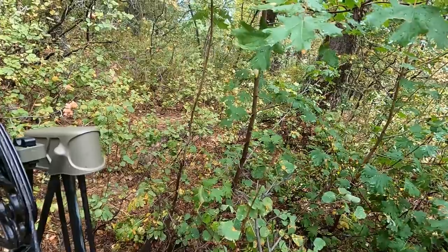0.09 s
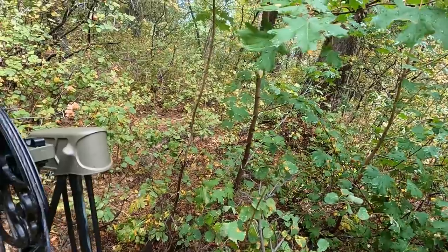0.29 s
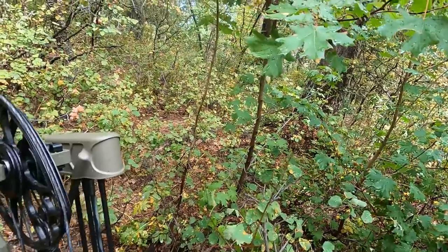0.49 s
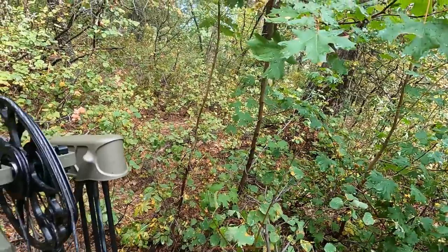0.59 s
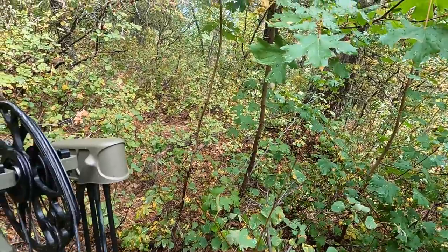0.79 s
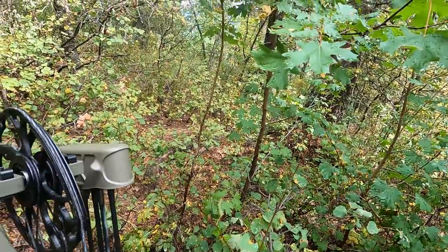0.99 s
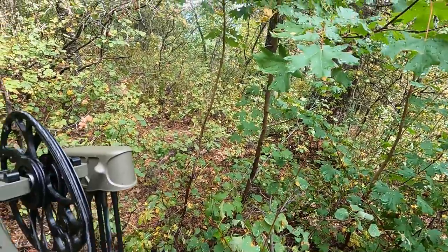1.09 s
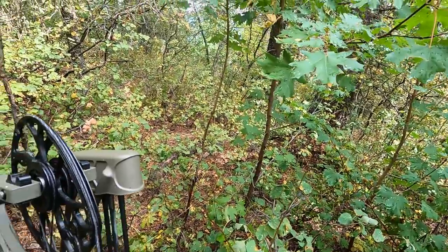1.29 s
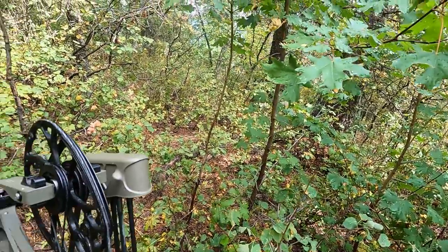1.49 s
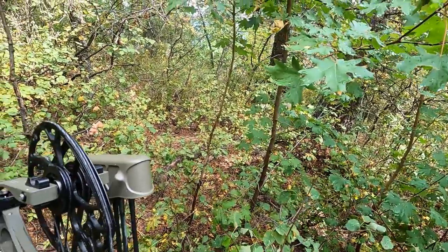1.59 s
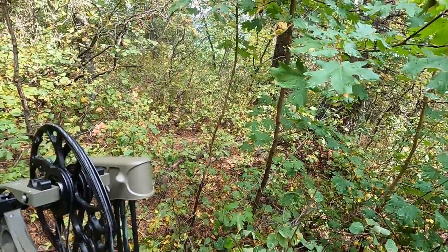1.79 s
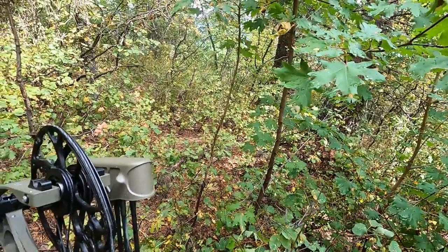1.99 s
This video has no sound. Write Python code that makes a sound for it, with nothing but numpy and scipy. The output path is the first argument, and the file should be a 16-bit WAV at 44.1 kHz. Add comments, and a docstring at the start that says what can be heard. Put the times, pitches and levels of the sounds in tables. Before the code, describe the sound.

Handling thump on a camera in quiet woods. A pale hollow tone around 1.2 kHz fades by 0.3 s while cloth friction grows from 0.1 s with a thin high whistle. A hard knock at 0.25 s, then a deep thump at 0.34 s stops the scrape. A faint whine lingers to 0.63 s, a small tick at 0.59 s; weak low hum, stirring near 1.8 s, and soft leafy hiss continue to 2 s.

```python
"""Cloth over a hand-held camera in quiet woods

Cloth slides over the housing, growing louder, bumps it and stops with a deep thump; the grip's faint hum
goes on over the soft hiss of the woods. Hisses are noise shaped in short-time spectra; hum, creak, rustle,
sway, hollow tone and whistle are noise through resonances; bumps are smooth pushes on ringing modes;
ticks are bursts of banded noise and a faint whine is a sine."""
import sys
import numpy as np
from scipy import signal
from scipy.io import wavfile
from scipy.ndimage import uniform_filter1d

SR = 44100
rng = np.random.default_rng(int(sys.argv[2]) if len(sys.argv) > 2 else 0)


def unload_wav(signal):
    """Save mono or channel-first audio to the path in sys.argv[1] as 16-bit WAV at rate SR, clipped to [-1, 1]."""
    wavfile.write(
        sys.argv[1],
        SR,
        np.round(np.clip(np.atleast_2d(signal).T, -1, 1) * 32767).astype(np.int16),
    )


N = 88200  # two seconds


def amp(db):
    """Gain of a level in dB."""
    return 10 ** (np.asarray(db) / 20)


def evened(x):
    """Scale to an RMS of 1."""
    return x / np.sqrt(np.mean(x ** 2) + 1e-20)


def read(points, hz):
    """Columns of a spectrum table, read on a log-frequency axis."""
    f, *values = np.transpose(points)
    return np.array([np.interp(np.log(hz + 1), np.log(f + 1), v) for v in values])


def curve(points, t):
    """Columns of a time table, read at times t."""
    s, *values = np.transpose(points)
    return np.array([np.interp(t, s, v) for v in values])


def sides(pan_db):
    """Left and right gains for a left-right difference in dB."""
    return amp(np.array([pan_db / 2, -pan_db / 2]))


def ring(x, hz, width_hz):
    """A resonance of fixed or moving pitch: shift it to 0 Hz, smooth, shift back."""
    turn = np.exp(2j * np.pi * np.cumsum(hz * np.ones(N)) / SR)
    r = np.exp(-np.pi * width_hz / SR)
    smooth = signal.lfilter([1 - r], [1, -r], x / turn)
    return 2 * (turn * smooth).real


def pair(same):
    """Left and right white noise of a given likeness."""
    a, b = rng.standard_normal((2, N))
    same = np.clip(same, -1, 1)
    return np.array([a, same * a + np.sqrt(1 - same ** 2) * b])


def frames(size, same, patch_db):
    """Random short-time spectra for two channels, with drifting louder and softer patches."""
    a, b, c, d, patch = rng.standard_normal((4 * N // size + 5, size // 2 + 1, 5)).T
    patch = uniform_filter1d(patch, size=size // 64, axis=0)  # over frequency
    patch = evened(uniform_filter1d(patch, size=10, axis=1))  # over time
    same = np.clip(same, -1, 1)
    left = a + 1j * b
    right = same * left + np.sqrt(1 - same ** 2) * (c + 1j * d)
    return np.array([left, right]) * amp(patch_db * patch)


def sound(z, size):
    """Short-time spectra back to a waveform."""
    return signal.istft(z, nperseg=size, noverlap=3 * size // 4)[1][:, :N]


def shaken(modes, same, pan_db, lumps_db, level):
    """Lumpy noise on a level curve shakes modes; each is two resonances in a row, the second twice as wide."""
    lumps = uniform_filter1d(rng.standard_normal(N), size=900)
    lumps = evened(uniform_filter1d(lumps, size=900))
    drive = pair(same) * amp(lumps_db * lumps + curve(level, np.arange(N) / SR)[0])
    gain = np.sqrt(sum(amp(2 * db) * np.pi * w / SR for _, w, db in modes) / 2)
    rung = sum(amp(db) * ring(ring(drive, hz, w), hz, 2 * w) for hz, w, db in modes)
    return rung / gain * sides(pan_db)[:, None]


def woods():
    """Distant leaves and air: smooth stereo hiss with a slow swell."""
    # tilt of the hiss: f/Hz, relative density/dB
    hiss_tilt = [(25, -31), (100, -12), (300, -4), (550, -14), (800, -16.5), (1500, -18), (2100, -22),
                 (3300, -27), (4550, -24), (5050, -21.5), (5700, -23), (7400, -28.5), (8600, -35),
                 (11800, -41.5), (13000, -50), (15500, -77)]
    # likeness of the two sides: f/Hz, likeness (0-1)
    hiss_same = [(60, 0.75), (240, 0.66), (950, 0.29), (3770, 0.65), (15000, 0.53)]
    # stereo balance: f/Hz, left over right/dB
    hiss_pan = [(60, -6), (240, 1.5), (950, -7), (3770, 1.5), (15000, 2.5)]
    # arrival at the two sides: f/Hz, phase by which left leads/rad
    hiss_lead = [(100, 0), (800, -.5), (2700, -1.3), (4300, -.4), (5600, -.1)]
    level_db, swell_db, patch_db = -62, .5, 1.2

    hz = np.fft.rfftfreq(1024, 1 / SR)
    z = frames(size=1024, same=read(hiss_same, hz)[0][:, None], patch_db=patch_db)
    t = np.arange(z.shape[2]) * 256 / SR
    swell = evened(sum(np.sin(2 * np.pi * (f * t + rng.random())) / np.sqrt(f)
                       for f in np.geomspace(.3, 6, num=20)))
    z = z * amp(read(hiss_tilt, hz)[0][:, None] + swell_db * swell)
    z = z * sides(read(hiss_pan, hz)[0])[:, :, None]
    z[0] *= np.exp(1j * read(hiss_lead, hz)[0])[:, None]
    return amp(level_db) * evened(sound(z, size=1024))


def hollow():
    """A pale hollow tone, narrow resonances in noise, hangs in the air at first and fades."""
    # resonances: f/Hz, width/Hz, relative level/dB
    hollow_modes = [(1227, 35, 11), (7800, 120, -13.5)]
    # fade: t/s, level/dB
    hollow_fade = [(0, -52.5), (.09, -56), (.16, -60), (.3, -104)]
    t = np.arange(N) / SR
    tone = shaken(hollow_modes, same=0.66, pan_db=0, lumps_db=0.98, level=hollow_fade)
    return tone * (t < hollow_fade[-1][0])


def whine():
    """A faint thin whine after the thump: a steady sine with soft ends."""
    # one row: start t/s, end t/s, f/Hz, RMS level at its middle/dB
    start, end, hz, db = (.375, .63, 4802, -82)
    t = np.arange(N) / SR
    swell = np.sin(np.pi * np.clip((t - start) / (end - start), 0, 1)) ** .5
    return amp(db) * np.sqrt(2) * swell * np.sin(2 * np.pi * hz * t)


def grip_hum():
    """The grip works on the housing: a low hum of gliding pitch and an upper creak, cut below."""
    # low hum: t/s, level/dB
    hum_level = [(0, -46.5), (.12, -46.5), (.145, -42), (.22, -39), (0.249, -40), (.285, -47), (.345, -61),
                 (.39, -52), (.44, -48.5), (.47, -59), (.55, -57), (.66, -59.5), (.73, -50), (.97, -52),
                 (1.0, -60.5), (1.04, -48.5), (1.25, -55.5), (1.34, -53), (1.45, -45), (1.602, -58.5),
                 (1.632, -50), (1.758, -49), (1.797, -39.5), (1.846, -52), (1.876, -37.5), (1.92, -51.5),
                 (2, -50.5)]
    # its pitch as the grip tightens and slackens: t/s, f/Hz
    hum_pitch = [(.1, 160.3), (.25, 177.3), (.7, 148.4), (.85, 165.8), (1.15, 161), (1.4, 147), (1.8, 169),
                 (2, 166)]
    # creak resonances: f/Hz, width/Hz, relative level/dB
    creak_modes = [(273.7, 83.6, -3), (403, 89, -19.5)]
    # creak: t/s, level/dB
    creak_level = [(0, -65.5), (0.251, -35.5), (.275, -47), (.4, -71.5), (.53, -54), (.65, -65.5),
                   (1.5, -59.5), (1.7, -65.5), (1.79, -53.5), (1.88, -59), (2, -49.5)]
    same, pan_db, hum_width_hz, low_cut_hz = 0.63, -2.5, 37.5, 128

    pitch = curve(hum_pitch, np.arange(N) / SR)[0]
    hum = shaken([(pitch, hum_width_hz, 0)], same, pan_db, lumps_db=1, level=hum_level)
    creak = shaken(creak_modes, same, pan_db, lumps_db=1.0, level=creak_level)
    low_cut = signal.butter(4, low_cut_hz, "high", fs=SR, output="sos")
    return signal.sosfilt(low_cut, hum + creak)


def rustle():
    """Thin rustle of the shell: noise shakes its modes."""
    # shell modes: f/Hz, width/Hz, relative level/dB
    shell_modes = [(1088, 216, 5.5), (1219, 234, 9), (1418, 248, 8.5)]
    # rustle: t/s, level/dB
    rustle_level = [(0, -54.5), (0.098, -55.5), (0.139, -48.5), (.18, -58), (.33, -49.5), (.36, -64),
                    (.7, -66.5), (1.35, -74.5), (1.6, -70), (1.73, -61.5), (1.78, -70), (2, -63.5)]
    return shaken(shell_modes, same=0.65, pan_db=1, lumps_db=0.98, level=rustle_level)


def ticks():
    """Dry ticks: decaying noise bursts through three equal resonances in a row."""
    # ticks: t/s, burst level before the resonances/dB, centre f/Hz
    tick_list = [(.104, -56, 10000), (.355, -40, 8600), (.591, -48, 3200)]
    width_hz, decay_s = 2200, .002
    t, out = np.arange(N) / SR, np.zeros((2, N))
    for s, db, hz in tick_list:
        burst = pair(0.28) * (t >= s) * np.exp(-np.maximum(t - s, 0) / decay_s)
        for _ in range(3):
            burst = ring(burst, hz, width_hz)
        out += amp(db) * burst
    return out


def sway():
    """The whole camera sways under the cloth: noise through one deep, broad resonance."""
    # sway: t/s, level/dB
    sway_level = [(0, -70), (.09, -62), (0.168, -62), (0.221, -32), (.3, -38), (0.334, -27), (.35, -34),
                  (.44, -63.5), (.7, -79), (2, -78)]
    hz, width_hz = 42.7, 54.4
    return shaken([(hz, width_hz, 0)], same=0.64, pan_db=-2, lumps_db=0.98, level=sway_level)


def blows():
    """Each blow is a smooth push; the longer the contact, the fewer high modes it wakes."""
    # blows on the housing: t/s, force/dB, contact/s, left over right/dB, direction (+1 or -1)
    blow_list = [(.113, -36, .012, -6, 1), (.2294, -20, .0033, 0, 1), (.2426, -15.5, .0046, -3.5, 1),
                 (.248, -3.5, .0003, 1.5, -1), (.2489, -5.5, .0028, 2, -1), (.2555, -15.5, .006, 6, 1),
                 (.2635, -19, .0013, -12, 1), (.3417, -5.5, .0007, -10, -1), (.3419, -4.5, .0021, 1, 1),
                 (.3462, -16, .0105, -17.5, 1), (.3513, -6.5, .0128, 6.5, -1)]
    # what the housing rings with: f/Hz, level per ms of push/dB, time to fall 60 dB/s, left over right/dB
    body_modes = [(40.5, -20, .155, -4.5), (66.8, -14, .035, -17), (199, -17, .06, -11),
                  (245, -8, .032, -4), (409, -12, .009, -12), (580, -9.5, .009, 4), (943, -9, .014, 1),
                  (1420, -10, .016, 6), (1800, -14, .005, 1)]

    force, t = np.zeros((2, N)), np.arange(N) / SR
    for s, db, contact, pan_db, way in blow_list:
        u = np.clip((t - s) / contact, 0, 1)
        push = np.sign(way) * amp(db) * np.sin(np.pi * u) ** 2
        force += sides(pan_db)[:, None] * push
    t = t[:SR // 2]
    body = sum(sides(pan_db)[:, None] * amp(db - 60 * t / t60) * np.sin(2 * np.pi * hz * t)
               for hz, db, t60, pan_db in body_modes)
    # 1000 / SR: one sample in ms
    return signal.fftconvolve(force, body * 1000 / SR, axes=1)[:, :N]


def whistle():
    """The cloth whistles thinly across the left microphone hole: noise through a narrow resonance."""
    # whistle: t/s, level/dB
    whistle_level = [(.12, -78), (.2, -51), (.3, -49), (0.338, -43)]
    hz, width_hz = 7264, 115
    t = np.arange(N) / SR
    tone = shaken([(hz, width_hz, 0)], same=0.47, pan_db=9, lumps_db=0.91, level=whistle_level)
    return tone * (t > whistle_level[0][0]) * (t < whistle_level[-1][0])


def slide():
    """Cloth on the housing: fine friction hiss whose colour shifts as it presses harder."""
    # course of the slide: t/s, level/dB, pressure (0-1)
    slide_course = [(0, -72, 0), (.016, -62.5, 0.26), (.03, -52.5, 0), (.055, -63.5, 0), (.095, -66.5, 0.3),
                    (.125, -48.5, 0), (.17, -43.5, 0.34), (.21, -37.5, 0.25), (.26, -39.5, 0.48),
                    (.3, -35, 0.82), (.338, -35, 1), (.346, -57.5, 0.5), (.37, -59.5, 0), (.42, -85, 0.1)]
    # colour: f/Hz, light left/dB, light right/dB, pressed left/dB, pressed right/dB
    slide_colour = [(740, -21, -8.5, 10.5, 19.5), (1020, 6, 13, -33, 10.5), (1330, 19.5, 11.5, -13, 1),
                    (2090, 4, 1.5, 12.5, 15.5), (2930, 7.5, 1.5, 1.5, 7.5), (3280, 0, 6.5, 10, 16.5),
                    (4340, 5, -2.5, 15.5, 20.5), (4900, 6, 4.5, 7.5, 2), (6200, 5, 5.5, 4, 9),
                    (7460, 4.5, -1, 14, -22), (8420, -17.5, -6, 21, -2), (9500, -12, -12, 4.5, -23),
                    (12500, -21, -24, 2.5, 0), (13400, -24, -26, -2, -16), (15600, -56, -59, -11, -56)]

    z = frames(size=256, same=0.61, patch_db=1.5)
    colour = read(slide_colour, np.fft.rfftfreq(256, 1 / SR))[:, :, None]
    light, pressed = colour[:2], colour[2:]
    pressure = np.clip(curve(slide_course, np.arange(z.shape[2]) * 64 / SR)[1], 0, 1)
    shape = amp(light + pressure * (pressed - light))
    shape[:, :4] = 0  # no friction in the lowest bands
    # colour alone changes with pressure: every frame is brought to the same power
    shape_rms = np.sqrt((shape ** 2).mean((0, 1)))
    hiss = evened(sound(z * shape / shape_rms, size=256))
    t = np.arange(N) / SR
    return hiss * amp(curve(slide_course, t)[0]) * (t < slide_course[-1][0])


def scene():
    """All layers together, from the woods to the cloth."""
    background = woods() + hollow() + whine()
    housing = grip_hum() + rustle() + ticks() + sway() + blows()
    cloth = whistle() + slide()
    return background + housing + cloth


def record(dry):
    """The band limit: a steep low-pass."""
    edge_hz = 15680
    low_pass = signal.firwin(511, edge_hz, window=("kaiser", 9), fs=SR)
    return signal.oaconvolve(dry, low_pass[None], "same")


dry = scene()
out = record(dry)
unload_wav(out)
```